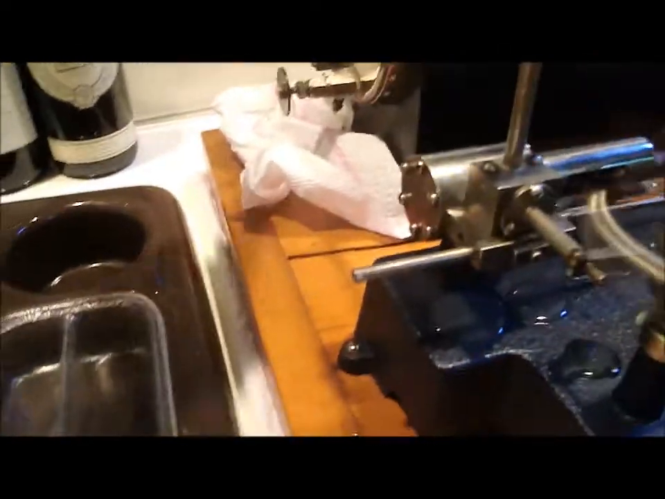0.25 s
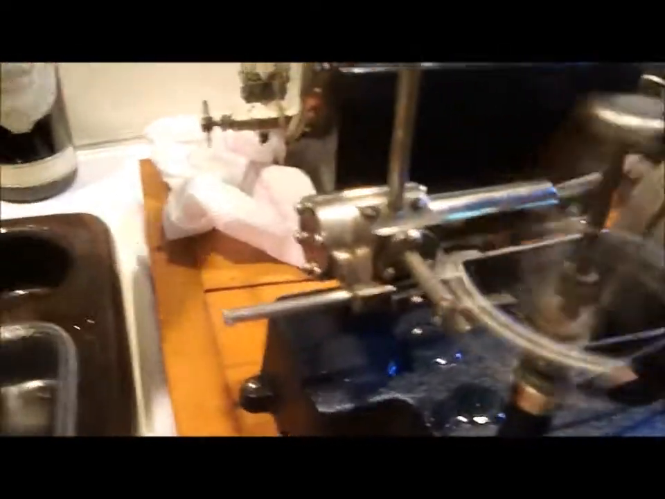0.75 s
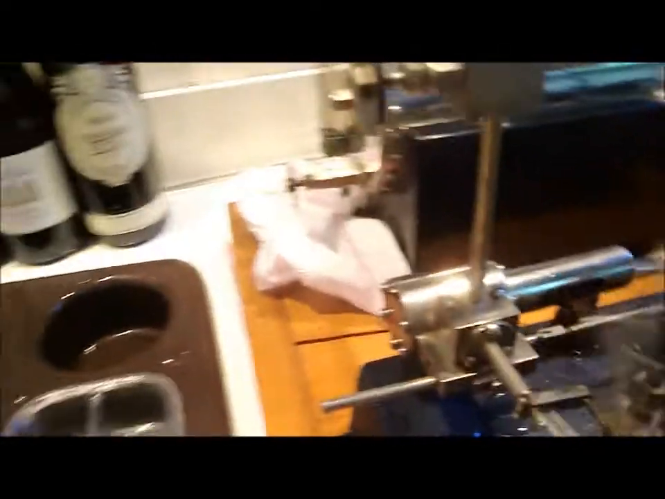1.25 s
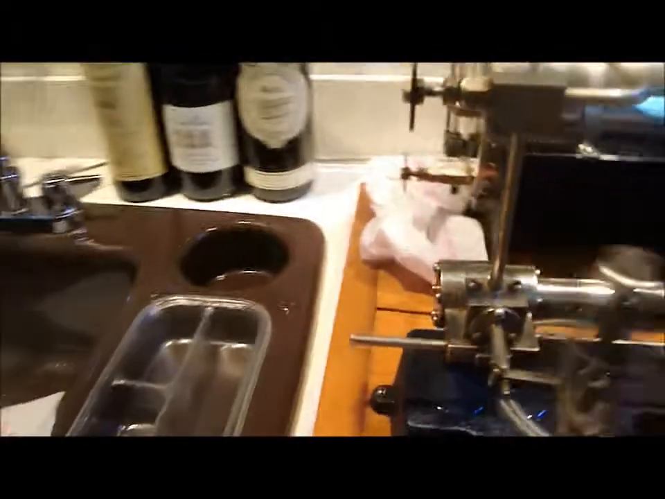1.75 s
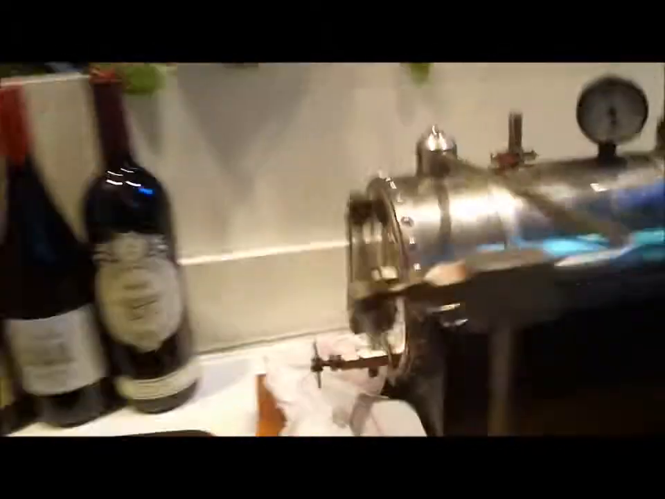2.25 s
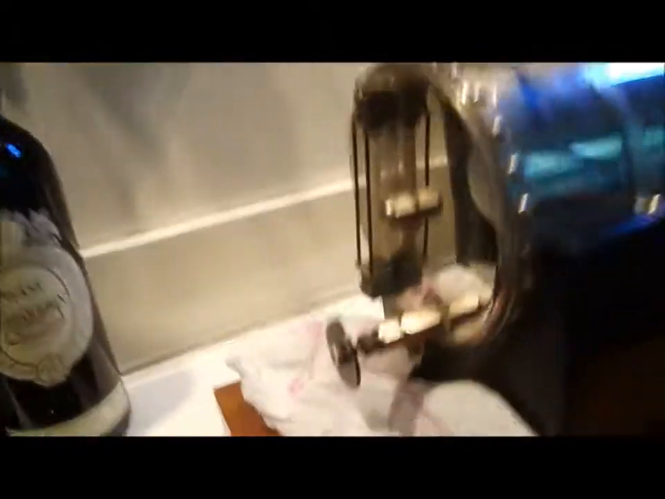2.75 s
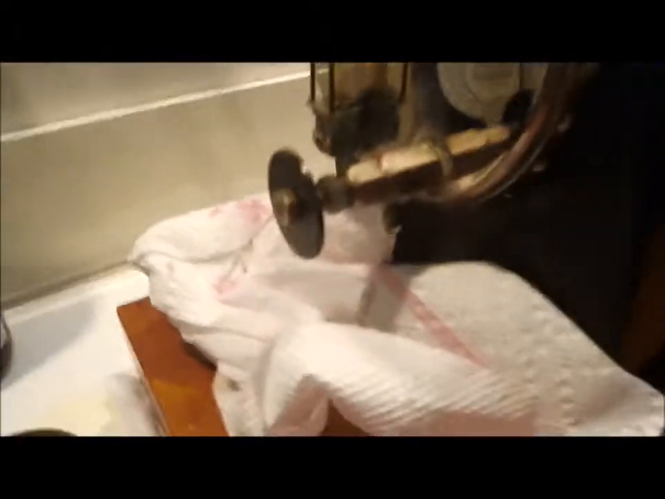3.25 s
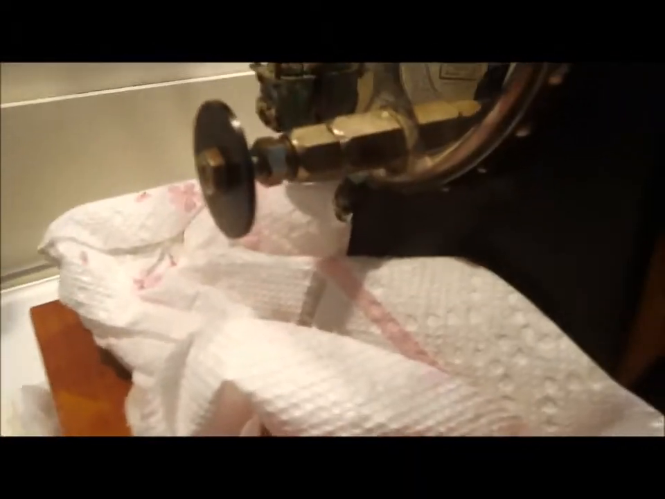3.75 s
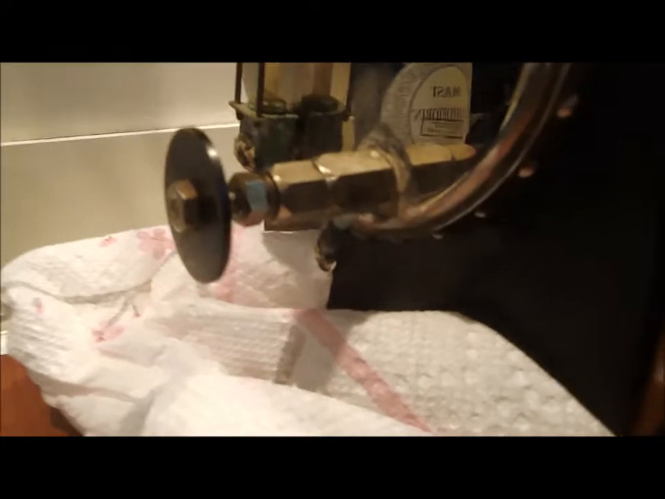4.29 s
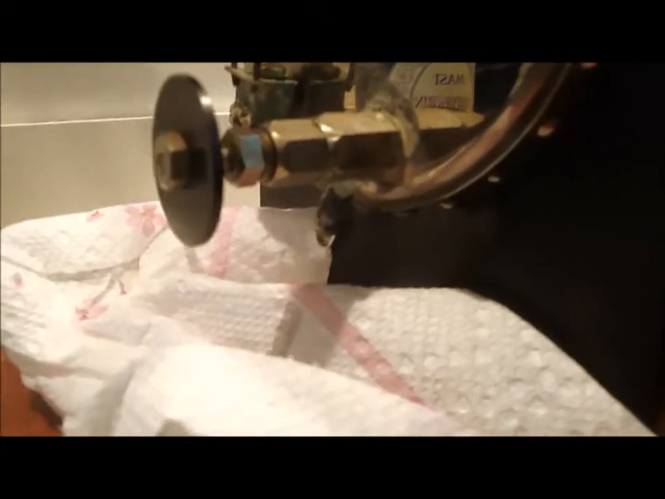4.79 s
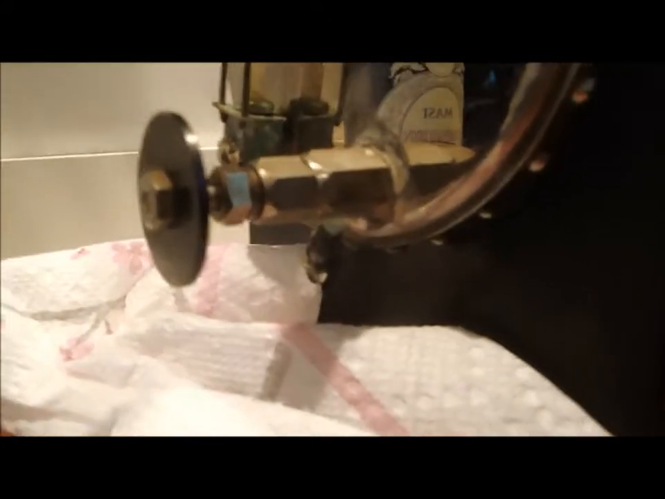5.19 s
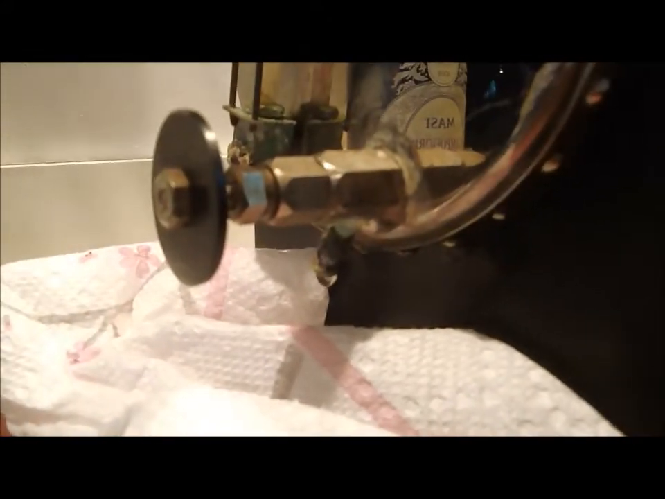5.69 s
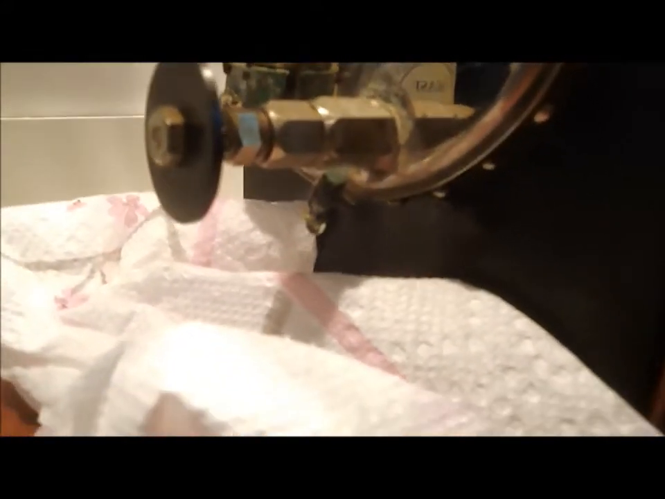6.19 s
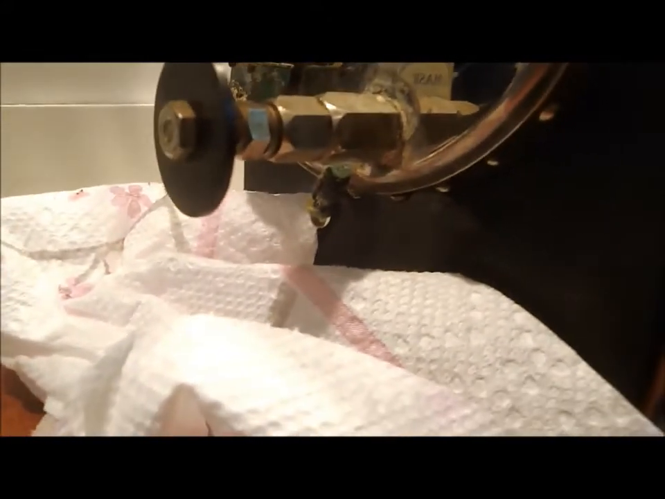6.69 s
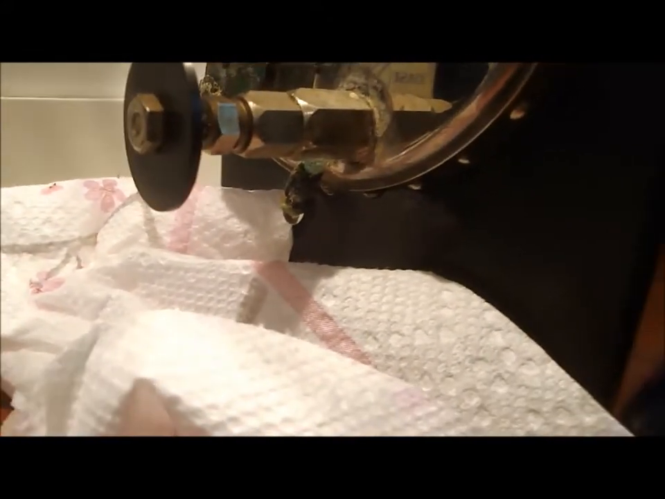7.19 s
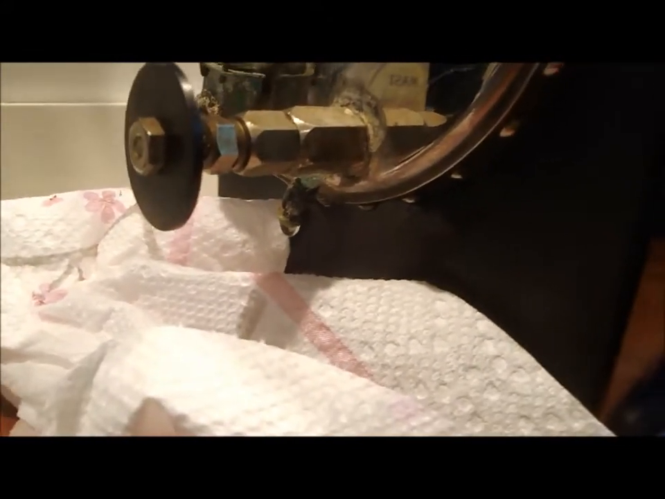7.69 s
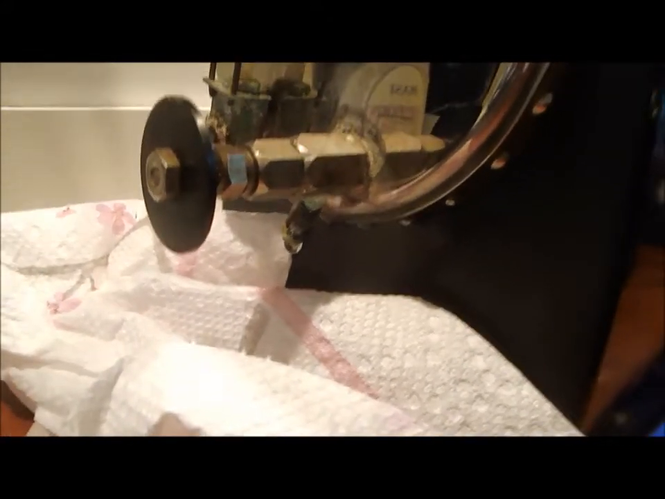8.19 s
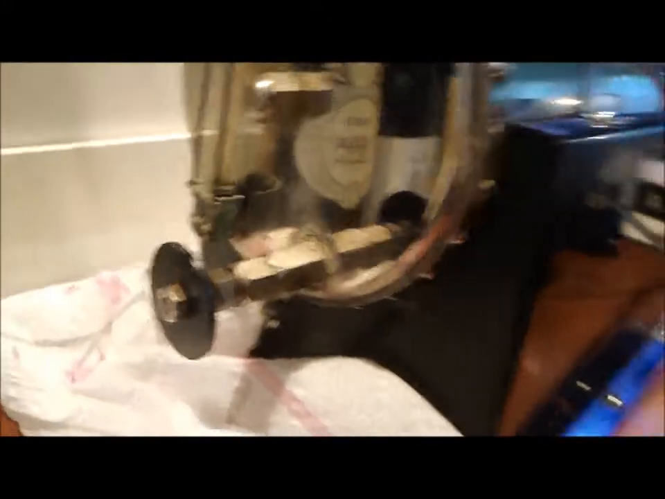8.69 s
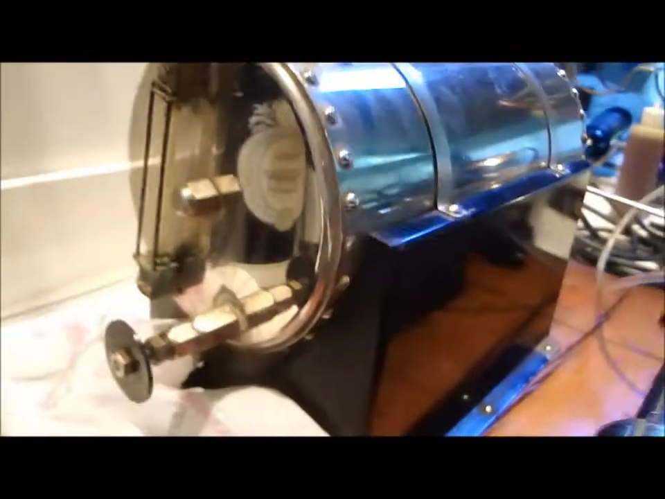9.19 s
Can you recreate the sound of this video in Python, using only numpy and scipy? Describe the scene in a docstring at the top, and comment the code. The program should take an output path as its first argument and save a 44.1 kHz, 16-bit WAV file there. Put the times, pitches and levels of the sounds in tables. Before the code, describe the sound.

Rapid, even steam puffs and rattling linkage knocks run without pause as the microphone moves in from the cylinder to a sputtering boiler gauge.

```python
"""Model steam engine on a kitchen counter.

About nine turns a second, two chuffs a turn: noise shaped by a valve-flow curve, with pipe resonances.
Knocks at set crank angles ring the frame; piston reversals throb in the bed. Short wide noise bursts mark
sharp puff onsets and clicks; decaying sines near 785 Hz sputter at the boiler's water gauge, with accents.
The microphone moves from cylinder to gauge, and the counter's echo sweeps through the hiss. Kitchen tail,
faint steady hiss.
"""
import sys
import numpy as np
from scipy import signal
from scipy.fft import rfft, irfft, next_fast_len
from scipy.io import wavfile
from scipy.ndimage import map_coordinates

SR = 44100
rng = np.random.default_rng(int(sys.argv[2]) if len(sys.argv) > 2 else 0)


def to_wav(sig):
    """Store sig (one row per channel, or 1-D mono) as 16-bit WAV at the path in sys.argv[1].

    Samples outside -1..1 are clipped; the rate is SR.
    """
    pcm = np.clip(np.atleast_2d(sig), -1, 1) * 32767
    pcm = np.round(pcm).astype(np.int16)
    wavfile.write(sys.argv[1], SR, pcm.T)  # frames by channels


N = 416731
TIME = np.arange(N) / SR

# crank position, also used by linkage and bed: (time [s], angle [turns])
CRANK_TURNS = [(0, -.163), (1.1454, 10), (2.7241, 24), (4.0797, 36), (5.6618, 50), (7.2419, 64),
               (9.3861, 83), (9.499, 84)]
# exhaust flow over one turn: (crank angle [deg], relative flow [dB])
VALVE_FLOW = [(0, -9), (5, -2), (13, 1), (40, -2), (58, -5.5), (84, -14.5), (118, -13), (150, -8),
              (166, -23.5), (185, -14.5), (194, 0), (242, -2.5), (268, -10), (297, -11.5), (316, -2),
              (332, -17.5), (346, -32)]
# jet spectrum at the pipe mouth: (frequency [Hz], relative level [dB])
JET_SPECTRUM = [(100, -55), (300, -10), (1300, -12), (2500, -13), (4700, -4), (5650, -6), (6050, -5),
                (6600, -5), (7400, -4), (8450, 4), (8850, -1.5), (9100, 0.5), (9750, -3.5), (10400, 8.5),
                (11100, -2)]
# exhaust pipe resonances, two low then four high:
# (frequency [Hz], pole width [Hz], relative level [dB], half-excitation flow [0-1])
PIPE_MODES = [(4423, 420, -2, 0.21), (4632, 590, 2.5, 0.63), (7760, 750, 0, 1), (7990, 620, 0.5, 1),
              (10300, 180, -22, 1), (10830, 137, 2.5, 1)]
# high pipe tones: (time [s], relative level [dB])
HIGH_TONE_LEVEL = [(0, -31.5), (0.35, -32.5), (0.7, -35), (1.55, -31), (2.05, -32.5), (2.5, -29.5),
                   (2.8, -32), (3.35, -27.5), (3.7, -35.5), (4.5, -27), (6.0, -31.5), (6.5, -28),
                   (7.5, -30), (8.85, -27.5), (9.45, -30)]


def exhaust(high_db=-3.0, flutter_db=1.13, stroke_db=0.85):
    """Two valve puffs a turn: jet noise grows with the flow, pipe tones level off."""
    angle_deg = follow(CRANK_TURNS)[0] % 1 * 360
    flow_db = np.interp(angle_deg, *np.transpose(VALVE_FLOW), period=360)
    # wet steam comes unevenly
    flow = amp(flow_db + flutter_db * drift(280) + stroke_db * drift(12))
    jet = unit(colour(rng.standard_normal(N) * flow, JET_SPECTRUM))

    tones = []
    for hz, width_hz, db, half_flow in PIPE_MODES:
        excitation = rng.standard_normal(N) * flow / (flow + half_flow)
        tones.append(amp(db) * resonate(excitation, hz, width_hz))
    low_tones, high_tones = unit(sum(tones[:2])), unit(sum(tones[2:]))

    jet_gain = heard(level_db=-24, nearness=0.67, gauge_db=-2.5)
    high_gain = amp(follow(HIGH_TONE_LEVEL)[0] + high_db)
    low_gain = heard(level_db=-42, nearness=0.027, gauge_db=6.0)
    return jet_gain * jet + high_gain * high_tones + low_gain * low_tones


# short wide noise bursts in the exhaust: (time [s], relative peak [dB])
STEAM_BURSTS = [(4.221, -10.5), (4.3093, -11), (4.366, -24), (5.1007, -18), (5.3839, -13), (5.888, -22),
                (6.0038, -11), (6.2883, -23), (6.626, -19), (6.6605, -17), (6.9046, -17), (7.0193, -18),
                (7.5831, -15), (8.148, -19)]


def steam_bursts(level_db=4, fall_s=0.0018):
    """Short wide noise bursts in the exhaust: sharp puff onsets and clicks."""
    t = np.arange(SR // 30) / SR
    bursts = np.zeros(N)
    for at_s, db in STEAM_BURSTS:
        add(bursts, at_s, amp(db + level_db) * np.exp(-t / fall_s) * rng.standard_normal(len(t)))
    return colour(bursts, [(60, -60), (200, -25), (600, -5), (1400, -6.5), (3000, -7.5), (11000, -9)])


# linkage play taken up each turn: (crank angle [deg], relative push [dB], contact [ms],
# relative rattle [dB], rms timing scatter [ms])
LINKAGE_KNOCKS = [(9.95, 3.5, 1.03, -6, 0.41), (17.26, -5.5, 0.92, -4, 0.41), (28.3, -1.5, 1.42, -7, 0.35),
                  (55.2, -7.5, 1.67, -9.5, 1.4), (90.4, -10, 2.2, -7.5, 1.5), (129.1, -3, 2.8, -11, 2.4),
                  (167.3, -1, 3.1, -9.5, 0.42), (207.3, -18, 0.95, -4, 1.5), (242, -9.5, 0.95, -1, .7),
                  (260.1, -5.5, 1.9, -4, 0.35), (269, -7.5, 1.64, -3.5, 0.37),
                  (304.3, -0.5, 1.51, -12.5, 1.77), (345.7, -3, 2.33, -9.5, 0.65)]
# knock strength: (time [s], relative level [dB])
KNOCK_STRENGTH = [(0, 0), (1.5, 1.5), (2.2, 0), (4.0, -2.5), (4.8, -0.5), (5.7, 2), (6.6, .5), (8.2, -0.5),
                  (9.45, -1)]


def linkage(uneven_db=1.57, rattle_s=0.011, grain_db=0.6):
    """Each knock pushes the frame and sets loose parts chattering against it."""
    turn_s, turns = np.transpose(CRANK_TURNS)
    t = np.arange(SR // 16) / SR
    push, chatter_power = np.zeros(N), np.zeros(N)
    for angle_deg, push_db, contact_ms, rattle_db, scatter_ms in LINKAGE_KNOCKS:
        times_s = np.interp(np.arange(turns[-1]) + angle_deg / 360, turns, turn_s)
        blow = np.sin(np.pi * np.minimum(t * 1000 / contact_ms, 1)) ** 2
        blow /= blow.sum()
        for time_s, (late, hard, loose) in zip(times_s, rng.standard_normal((len(times_s), 3))):
            at_s = time_s + late * scatter_ms / 1000
            add(push, at_s, amp(push_db + uneven_db * hard) * blow)
            chatter_db = rattle_db + uneven_db * (hard + loose) / np.sqrt(2)
            add(chatter_power, at_s, amp(chatter_db) ** 2 * np.exp(-2 * t / rattle_s))
    rattle = np.sqrt(chatter_power) * amp(grain_db * drift(450)) * rng.standard_normal(N)

    knock_gain = heard(level_db=-41.5, nearness=0.9, gauge_db=1.04) * amp(follow(KNOCK_STRENGTH)[0])
    rattle_gain = heard(level_db=-34, nearness=1.19, gauge_db=-0.67)
    return knock_gain * frame(push) + rattle_gain * frame(rattle)


# engine frame and bed plate modes:
# (frequency [Hz], width [Hz], relative level at cylinder [dB], relative level at gauge [dB])
FRAME_MODES = [(207, 10.4, -1.5, -22), (310, 14.3, -12, -1), (340.4, 15.4, 4, -4.5), (409, 30, -33, 0.5),
               (464.3, 27, 2.5, 1), (579, 107, -5, -4.5), (715, 134, 1.5, -8), (784, 100, -6, 3),
               (976, 330, 0, -34), (1142, 150, 3.5, -3), (1250, 240, -19, 0), (1500, 105, -13, -4.5),
               (2040, 340, -10, -11.5)]


def frame(force, radiate_hz=210):
    """Damped modes ring to a force; their balance depends on the microphone's place."""
    t = np.arange(SR // 4) / SR
    hz, width_hz, cylinder_db, gauge_db = np.transpose(FRAME_MODES)[:, :, None]
    modes = width_hz * np.exp(-np.pi * width_hz * t) * np.cos(2 * np.pi * hz * t)
    # a small frame radiates little bass
    force = signal.sosfilt(signal.butter(2, radiate_hz, "high", fs=SR, output="sos"), force)

    def ring(mode_db):
        return unit(signal.oaconvolve(force, (amp(mode_db) * modes).sum(0))[:N])

    place = follow(MIC_PLACE)[0]
    return (1 - place) * ring(cylinder_db) + place * ring(gauge_db)


# accented ringing taps near 785 Hz, some hard knocks, some sputter pops: (time [s], relative level [dB])
ACCENT_TAPS = [(3.398, -23), (3.688, -21), (3.72, -24), (4.115, -23), (4.165, -22), (4.533, -23),
               (5.758, -20.5), (6.658, -19), (6.731, -21), (7.581, -19), (7.773, -27), (7.806, -16),
               (7.875, -19.5), (8.419, -22), (8.457, -21), (9.003, -25), (9.036, -22)]
# louder moments of the sputter, some on knocks: (start [s], length [s], relative level [dB])
SPUTTER_SWELLS = [(3.654, 0.15, -35.5), (4.077, 0.13, -34), (4.72, 0.063, -34), (4.952, 0.046, -31.5),
                  (5.538, 0.03, -31), (5.753, 0.035, -37), (5.976, 0.044, -37), (6.65, 0.11, -35),
                  (6.996, 0.036, -34), (7.773, 0.15, -34), (8.1, 0.096, -35), (8.252, 0.19, -38.5),
                  (8.708, 0.055, -31), (9.004, 0.14, -37.5)]
SIMMER_FROM_S, SIMMER_TO_S = 3.37, 9.17


def sputter(hz=785, spread=0.044, ring_s=0.0042, rise_s=0.00094, per_s=110, size_db=4.0,
            simmer_db=-45, swell_db=-3.5, ease_s=0.019, accent_db=3):
    """Bubbles ring the gauge fitting's cavity at scattered pitches, with swells and accented taps."""
    t = np.arange(SR // 16) / SR
    shape = np.exp(-t / ring_s) * (1 - np.exp(-t / rise_s))
    bubbles, accents = np.zeros(N), np.zeros(N)
    for place, size in rng.random((int(per_s * N / SR), 2)):
        pitch_hz = hz * (1 + spread * rng.standard_normal())
        gain = amp(size_db * min(-np.log(size), 3))
        add(bubbles, place * N / SR, gain * shape * np.sin(2 * np.pi * pitch_hz * t))
    for (at_s, db), detune in zip(ACCENT_TAPS, rng.standard_normal(len(ACCENT_TAPS))):
        pitch_hz = hz * (1 + spread * detune / 2)
        add(accents, at_s, amp(db + accent_db) * shape * np.sin(2 * np.pi * pitch_hz * t))

    strength = amp(simmer_db) * gate(SIMMER_FROM_S, SIMMER_TO_S, ease_s)
    for start_s, length_s, db in SPUTTER_SWELLS:
        swell = amp(db + swell_db) * gate(start_s, start_s + length_s, ease_s)
        strength = np.maximum(strength, swell)
    return strength * unit(bubbles) + accents


# bed harmonics under two piston reversals a turn: (multiple of turn rate, relative level [dB])
BED_SHAKE = [(10, -12), (11, -7), (14, -4), (15, -10), (16, -1.5), (17, -10), (23, -2.5), (24, 3)]


def bed(reversal_deg=184, waver_db=3.0):
    """The piston's reversals shake the bed: a low throb locked to the crank."""
    turns = follow(CRANK_TURNS)[0] - reversal_deg / 360
    throb = np.zeros(N)
    for multiple, db in BED_SHAKE:
        throb += amp(db + waver_db * drift(6.8)) * np.cos(2 * np.pi * multiple * turns)
    return heard(level_db=-57.5, nearness=0.74, gauge_db=2.5) * unit(throb)


# counter echo path: (time [s], extra delay [ms])
COUNTER_DELAY = [(0, 2.35), (.7, 2.26), (1.2, 2.6), (1.9, 2.4), (2.5, 2.18), (3.5, 1.98), (4, 1.4),
                 (4.5, 1.7), (6, 1.66), (8.3, 1.54), (9, 2.1), (9.45, 1)]
# nearest metal face echo: (time [s], extra delay [ms], relative strength [0-1])
METAL_ECHO = [(0, 0.41, 0.3), (.4, 0.39, 0.2), (.7, 0.77, 0.3), (1.2, 0.75, 0.08), (2.3, 0.68, 0.03),
              (2.7, 0.93, 0.2), (3.2, 0.63, 0), (3.6, 0.65, 0.02), (4.3, .655, 0.16), (5.3, 0.56, 0),
              (7, 0.57, 0.17), (8.4, 0.69, 0.19), (8.8, 0.49, 0.17)]


def counter(x, echo=0.38):
    """Reflections on moving delays: one off the counter, two bounces off the metal."""
    def delayed(ms):
        return map_coordinates(x, [np.arange(N) - ms * SR / 1000], order=3)

    gap_ms, strength = follow(METAL_ECHO)
    off_counter = echo * delayed(follow(COUNTER_DELAY)[0])
    off_metal = strength * (delayed(gap_ms) + delayed(2 * gap_ms) / 2)
    return (x + off_counter + off_metal) / np.hypot(1, echo)


# kitchen reverberation: (frequency [Hz], T60 [s])
KITCHEN_T60 = [(100, 0.38), (500, 0.37), (2000, 0.32), (6000, 1), (11000, 0.18)]


def kitchen(x):
    """A short tail of sparse reflections, each band dying at its own speed."""
    count = SR // 40
    taps = np.zeros(SR)
    # one random-sign tap in every 20 samples
    positions = 200 + 20 * np.arange(count) + rng.integers(0, 20, count)
    taps[positions] = rng.choice([-1., 1.], count)
    hz, t, bands = signal.stft(taps, SR, nperseg=256)
    decay = amp(-60 * t / read(KITCHEN_T60, hz)[:, None])
    tail = signal.istft(bands * decay, SR, nperseg=256)[1]
    return signal.fftconvolve(x, tail / np.linalg.norm(tail))[:N]


# steady hiss spectrum: (frequency [Hz], relative level [dB])
FLOOR_SPECTRUM = [(20, 8), (40, 10), (70, -1.5), (130, -16), (320, 4), (700, -5), (2000, 3), (8000, 1.5),
                  (11000, -21)]


def floor_hiss(level_db):
    """Steady coloured noise."""
    return amp(level_db) * unit(colour(rng.standard_normal(N), FLOOR_SPECTRUM))


# microphone place, also used by frame: (time [s], place [0 cylinder - 1 gauge])
MIC_PLACE = [(0, 0), (2.4, 0), (3.2, 0.12), (3.7, 1), (8.5, 0.98), (9.45, 0.4)]
# microphone closeness to the machinery: (time [s], gain before each source's share [dB])
MIC_CLOSENESS = [(0, -10), (0.4, -9), (1.0, -11), (1.6, -8.5), (2.2, -8), (2.6, -5.5), (3.2, -4.7),
                 (4.05, 0), (4.4, -1.4), (5.7, 0.5), (6.4, -0.5), (8.3, 0), (9.0, -2.5), (9.45, -5)]


def heard(level_db, nearness, gauge_db):
    """Gain at the moving microphone: a share of the closeness plus a change towards the gauge."""
    return amp(level_db + nearness * follow(MIC_CLOSENESS)[0] + gauge_db * follow(MIC_PLACE)[0])


def amp(db):
    """Decibels to gain."""
    return 10 ** (np.asarray(db) / 20)


def unit(x):
    """Scales to rms 1."""
    return x / np.sqrt(np.mean(x ** 2) + 1e-20)


def follow(rows):
    """Interpolates a time table's columns at every sample."""
    time_s, *columns = np.transpose(rows)
    return [np.interp(TIME, time_s, column) for column in columns]


def read(points, hz):
    """Interpolates a spectrum on a log-frequency axis."""
    point_hz, value = np.transpose(points)
    return np.interp(np.log(hz + 1), np.log(point_hz + 1), value)


def colour(x, points):
    """Filters x by a spectrum in dB."""
    size = next_fast_len(N + 4096)
    gain = amp(read(points, np.fft.rfftfreq(size, 1 / SR)))
    return irfft(rfft(x, size) * gain, size)[:N]


def resonate(x, hz, width_hz):
    """Resonance of gain 1 at its centre: one complex pole, applied twice."""
    radius = np.exp(-np.pi * width_hz / SR)
    pole = [1, -radius * np.exp(2j * np.pi * hz / SR)]
    once = signal.lfilter([1 - radius], pole, x)
    return 2 * signal.lfilter([1 - radius], pole, once).real


def drift(cutoff_hz):
    """Smooth low-passed noise of rms 1."""
    return unit(colour(rng.standard_normal(N), [(cutoff_hz, 0), (2 * cutoff_hz, -20), (4 * cutoff_hz, -80)]))


def add(mix, at_s, sound):
    """Mixes a sound in at a time, cut at the end."""
    if 0 <= at_s < N / SR:
        part = mix[int(at_s * SR):][:len(sound)]
        part += sound[:len(part)]


def gate(start_s, end_s, ease_s):
    """On between two times, with soft edges."""
    return np.clip(np.minimum(TIME - start_s, end_s - TIME) / ease_s + .5, 0, 1)


def scene(steam_room_db=-17, gear_room_db=-10, floor_db=-50):
    """Steam, machinery and sputter in the kitchen, over a faint steady hiss."""
    steam = counter(exhaust() + steam_bursts())
    gear = linkage() + sputter() + bed()
    room = kitchen(amp(steam_room_db) * steam + amp(gear_room_db) * gear)
    return (steam + gear + room + floor_hiss(floor_db))[None]


def record(dry, bass_hz=95, edge_hz=11070):
    """A small microphone without deep bass, then a steep low-pass."""
    thin = signal.sosfilt(signal.butter(2, bass_hz, "high", fs=SR, output="sos"), dry)
    band_limit = signal.firwin(901, edge_hz, window=("kaiser", 8), fs=SR)
    return signal.oaconvolve(thin, band_limit[None], "same")


dry = scene()
out = record(dry)
to_wav(out)
```